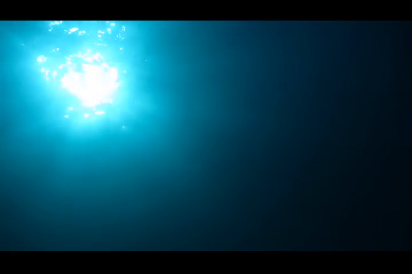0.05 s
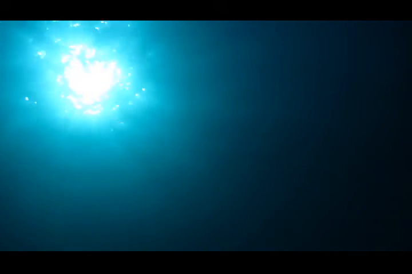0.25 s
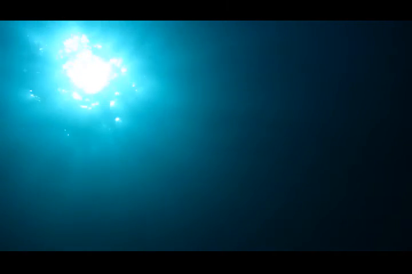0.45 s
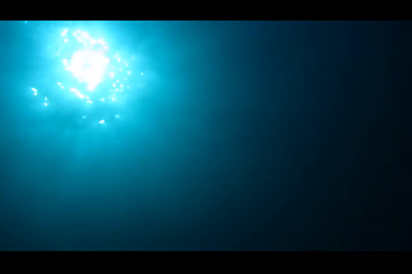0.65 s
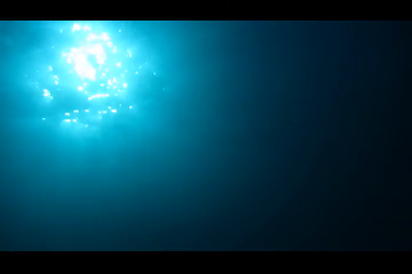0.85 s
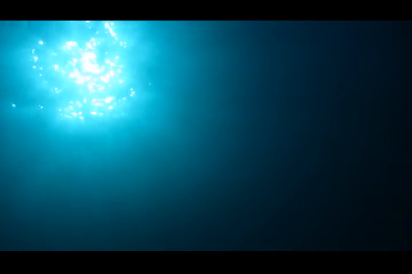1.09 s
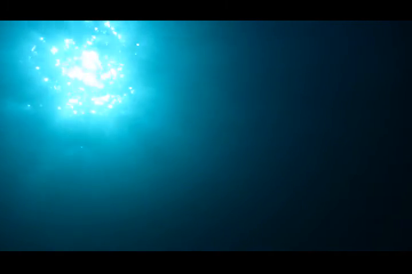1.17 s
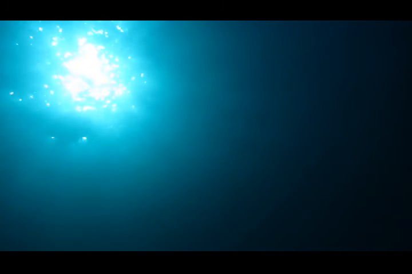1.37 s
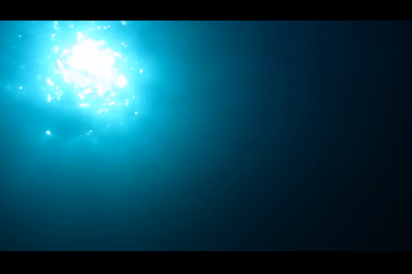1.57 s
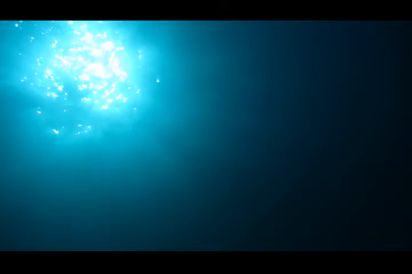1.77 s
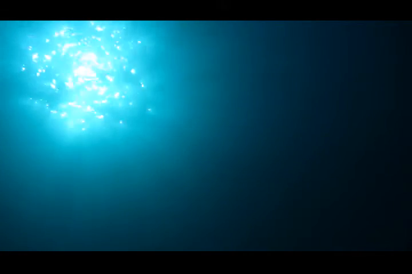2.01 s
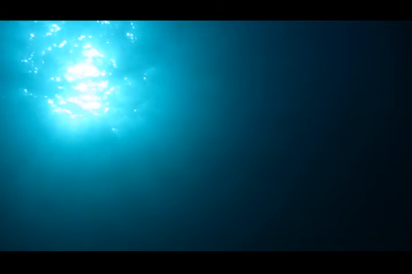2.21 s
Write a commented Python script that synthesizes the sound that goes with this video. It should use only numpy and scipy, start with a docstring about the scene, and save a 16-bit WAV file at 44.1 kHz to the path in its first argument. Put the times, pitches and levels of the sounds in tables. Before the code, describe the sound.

A whale moans once underwater, starting at about 0.2 seconds. The low, wavering, slightly raspy call is strongest from 0.5 to 1.5 seconds, slowly falls in pitch and fades by about 2.1 seconds with a faint echo. The water rumbles and hisses steadily throughout, with a few soft, short gurgles and faint scattered crackles. A very faint, thin, high whine runs underneath.

```python
"""A whale gives one long, slowly falling moan under water: three partials on one wavering pitch,
the second far the strongest, with a narrow noise rasp and a faint echo off surface and seabed.
Around it lie a few soft gurgles (short sinking tones), the water's steady rumble and hiss
(coloured noise) and faint crackles (decaying noise bursts).
The underwater recorder adds a thin, high whine."""
import sys
import numpy as np
from scipy import signal
from scipy.fft import rfft, irfft
from scipy.io import wavfile
from scipy.ndimage import uniform_filter1d

SR = 44100
rng = np.random.default_rng(int(sys.argv[2]) if len(sys.argv) > 2 else 0)


def wav_out(sig):
    """Save sig, one row per channel (or a flat mono array), as 16-bit PCM at SR to the path in sys.argv[1]."""
    wavfile.write(sys.argv[1], SR, np.round(np.clip(np.atleast_2d(sig).T, -1, 1) * 32767).astype(np.int16))


N = 99225
TIME = np.arange(N) / SR

# moan fundamental (time [s], pitch [Hz])
MOAN_PITCH = [(.17, 222.3), (.235, 238), (.28, 236.3), (.38, 234.6), (.43, 227.3), (.47, 232.1),
              (.56, 231.6), (.65, 227.7), (.77, 226.1), (.85, 229.5), (1.02, 222.3), (1.22, 214.2),
              (1.32, 215.7), (1.39, 208.9), (1.45, 212.7), (1.66, 203.8), (1.81, 202.4), (1.93, 195.2),
              (2.0, 186.2), (2.12, 190.3)]
# partials 1-3 and rasp (time [s], level [dB])
PARTIAL_1_LEVEL = [(.2, -60.5), (.34, -36), (.77, -33.5), (.85, -27), (.95, -33), (1.2, -29.5), (1.66, -24),
                   (1.9, -33), (2.05, -47)]
PARTIAL_2_LEVEL = [(.16, -34.5), (.235, -21), (.31, -17), (.39, -15), (.435, -19.5), (.485, -11),
                   (.57, -11), (.625, -13.5), (.70, -11.5), (.745, -18), (.80, -11.5), (.845, -10.5),
                   (.905, -18.5), (1.04, -19.5), (1.09, -14), (1.21, -13), (1.35, -12.5), (1.40, -14),
                   (1.53, -13.5), (1.73, -20.5), (1.81, -27), (1.89, -27.5), (1.95, -22), (2.01, -30),
                   (2.11, -42.5)]
PARTIAL_3_LEVEL = [(.25, -55), (.42, -47), (.82, -43.5), (.95, -58), (1.1, -44), (1.9, -42.5), (2.1, -45)]
RASP_LEVEL = [(.15, -48), (.33, -39.5), (.66, -37), (.8, -30.5), (.96, -39.5), (1.1, -28), (1.25, -34.5),
              (1.5, -30.5), (1.67, -40), (1.87, -33.5), (2.12, -46.5)]

def whale(jitter=.002, jitter_hz=30, shimmer_db=.31, shimmer_hz=35, fade_s=.04):
    """Three harmonics of one wavering pitch, with a narrow rasp above the strongest."""
    pitch_hz = uniform_filter1d(curve(MOAN_PITCH), size=900) * (1 + jitter * wander(jitter_hz))
    phase = 2 * np.pi * np.cumsum(pitch_hz) / SR
    partials = np.zeros(N)
    for k, levels in enumerate([PARTIAL_1_LEVEL, PARTIAL_2_LEVEL, PARTIAL_3_LEVEL], 1):
        level_db = curve(levels) + shimmer_db * wander(shimmer_hz)
        partials += amp(level_db) * np.cos(k * phase + 2 * np.pi * rng.random())
    rasp = amp(curve(RASP_LEVEL)) * unit(band(rng.standard_normal(N), hz=563.7, width_hz=65))
    start_s, end_s = PARTIAL_2_LEVEL[0][0], PARTIAL_2_LEVEL[-1][0]
    gate = np.clip(1 + np.minimum(TIME - start_s, end_s - TIME) / fade_s, 0, 1)
    return gate * (np.sqrt(2) * partials + rasp)


def sea_echo(x, level_db=-27, t60_s=1):
    """Faint diffuse tail from surface and seabed."""
    tail = rng.standard_normal(N) * amp(-60 * TIME / t60_s)
    return amp(level_db) * signal.fftconvolve(x, tail / np.linalg.norm(tail))[:N]


# gurgles (start [s], length [s], mid pitch [Hz], level [dB])
GURGLE_EVENTS = [(.04, .12, 298, -33.5), (.33, .05, 555, -29.5), (0.489, 0.18, 537, -27.5),
                 (.70, .075, 160, -30.5), (.705, .06, 630, -31.5), (.705, .06, 392, -30),
                 (.91, .08, 365, -40), (1.335, 0.08, 547.4, -28.5), (1.407, .075, 587.4, -29),
                 (1.6, 0.059, 548, -33.5), (1.718, .11, 601.4, -32.5), (2.025, 0.049, 569.3, -27.5),
                 (2.1, 0.064, 326.4, -35.5)]

def gurgles(sag=.08, roughness=.3, roughness_hz=35):
    """Short, rough, slightly sinking tones in the water."""
    out = np.zeros(N)
    for start_s, length_s, hz, level_db in GURGLE_EVENTS:
        progress = np.arange(0, length_s, 1 / SR) / length_s
        phase = 2 * np.pi * np.cumsum(hz * (1 - sag * (progress - .5))) / SR
        envelope = amp(level_db) * np.sqrt(2) * np.sin(np.pi * progress)
        rough = 1 + roughness * wander(roughness_hz)[:len(progress)]
        add(out, start_s, envelope * rough * np.sin(phase))
    return out


# water noise spectra; fizz also colours the ticks (frequency [Hz], relative density [dB])
RUMBLE_SPECTRUM = [(20, -27), (50, -23.5), (70, -13.5), (95, -9), (135, -3), (180, -1.5), (240, -7.5),
                   (320, -7), (420, -2.5), (520, 0.5), (600, -4), (680, -14.5), (750, -19.5), (820, -34),
                   (1500, -73.5)]
HISS_SPECTRUM = [(600, -43), (820, -18.5), (890, -11.5), (960, 0), (1075, 2), (1105, -14.5), (1135, 1.5),
                 (1250, 0), (1400, 1.5), (1500, 1), (1580, 2), (1680, -10.5), (1800, -19.5), (2000, -24.5),
                 (2300, -34), (3000, -49.5), (4500, -69)]
FIZZ_SPECTRUM = [(1500, -3), (2800, -3), (4100, -7.5), (5000, -4), (6800, -8), (7900, -2.5), (8700, -6),
                 (9600, -3), (12200, -2), (13200, -6.5), (15700, -9.5)]

def water():
    """Steady water noise: low rumble, mid-band hiss, fine fizz."""
    rumble = amp(-31) * wash(RUMBLE_SPECTRUM, drift_db=1.5)
    hiss = amp(-37) * wash(HISS_SPECTRUM, drift_db=.37)
    fizz = amp(-66.5) * wash(FIZZ_SPECTRUM, drift_db=1.4)
    return rumble + hiss + fizz


# noise bursts, ahead of filtering (start [s], snap gain [dB], ring gain [dB], decay [s])
CRACKLE_EVENTS = [(.059, -59, -66, .004), (.135, -53, -60, .002), (.44, -62, -63, .005),
                  (.554, -59, -50, .005), (.6, -63, -55, .006), (.77, -61, -62, .012),
                  (1.018, -63, -55, .005), (1.084, -55, -60, .004), (1.104, -57, -45.5, .007),
                  (1.129, -58, -56, .003), (1.611, -58, -66, .002), (1.749, -62, -52, .008)]
# snap filter (frequency [Hz], gain [dB])
SNAP_FILTER = [(1500, -3), (2900, 2), (3700, -5), (5200, 0), (7000, -7), (10000, -3), (13000, -5),
               (15700, -10)]

def crackles(ring_hz=12100, ring_width_hz=1100):
    """Sparse noise bursts, each a broad snap with a high ring."""
    snaps, rings = np.zeros((2, N))
    for start_s, snap_db, ring_db, decay_s in CRACKLE_EVENTS:
        rise_s = .3 * decay_s
        envelope = 2 * (1 - np.exp(-TIME / rise_s)) * np.exp(-TIME / decay_s)
        burst = envelope * rng.standard_normal(N)
        add(snaps, start_s, amp(snap_db) * burst)
        add(rings, start_s, amp(ring_db) * burst)
    return tinted(snaps, SNAP_FILTER) + band(rings, ring_hz, ring_width_hz)


def ticks(rate_per_s=130, level_db=-75.5, spread_db=3, decay_s=.0012):
    """Many tiny noise bursts of random time and size."""
    sizes = amp(spread_db * np.minimum(rng.exponential(1, N), 3))
    impulses = sizes * (rng.random(N) < rate_per_s / SR)
    envelope = signal.lfilter([1], [1, -np.exp(-1 / (decay_s * SR))], impulses)
    return amp(level_db) * unit(tinted(envelope * rng.standard_normal(N), FIZZ_SPECTRUM))


def recorder_whine(hz=12408, level_db=-69, flutter=.13, flutter_hz=90):
    """The recorder's thin tone, fluttering in level."""
    tone = amp(level_db) * np.sqrt(2) * np.sin(2 * np.pi * hz * TIME)
    return tone * (1 + flutter * wander(flutter_hz))


def amp(db):
    """Decibels to gain."""
    return 10 ** (np.asarray(db) / 20)


def unit(x):
    """Scales to unit rms."""
    return x / np.sqrt(np.mean(x ** 2) + 1e-20)


def curve(points):
    """Breakpoints to one value per sample."""
    return np.interp(TIME, *np.transpose(points))


def tinted(x, spectrum):
    """Filters by a spectrum, interpolated in log frequency."""
    hz, db = np.transpose(spectrum)
    bins_hz = np.fft.rfftfreq(N, 1 / SR)
    gain = amp(np.interp(np.log(bins_hz + 1), np.log(hz + 1), db))
    return irfft(rfft(x) * gain, N)


def band(x, hz, width_hz):
    """Steep band-pass, unity peak gain."""
    bins_hz = np.fft.rfftfreq(N, 1 / SR)
    return irfft(rfft(x) / np.sqrt(1 + (2 * (bins_hz - hz) / width_hz) ** 6), N)


def wander(rate_hz):
    """Low-passed noise, unit rms."""
    return unit(band(rng.standard_normal(N), 0, 2 * rate_hz))


def add(mix, start_s, sound):
    """Mixes a sound in at a time."""
    part = mix[max(round(start_s * SR), 0):][:len(sound)]
    part += sound[:len(part)]


def wash(spectrum, drift_db):
    """Unit-rms coloured noise whose level drifts in time-frequency patches."""
    cells = signal.stft(rng.standard_normal(N), nperseg=1024, noverlap=768)[2]
    patches = uniform_filter1d(rng.standard_normal(cells.shape), size=5, axis=0)
    patches = unit(uniform_filter1d(patches, size=12, axis=1))
    noise = signal.istft(cells * amp(drift_db * patches), nperseg=1024, noverlap=768)[1][:N]
    return unit(tinted(noise, spectrum))


def scene():
    """Moan and echo over the sounds of the water, mono."""
    moan = whale()
    return (moan + sea_echo(moan) + water() + gurgles() + ticks() + crackles())[None]


def record(dry, cutoff_hz=15750):
    """The recorder adds its whine, then limits the band."""
    lowpass = signal.firwin(1023, cutoff_hz, window=("kaiser", 9), fs=SR)
    return signal.oaconvolve(dry + recorder_whine(), lowpass[None], "same")


dry = scene()
out = record(dry)
wav_out(out)
```